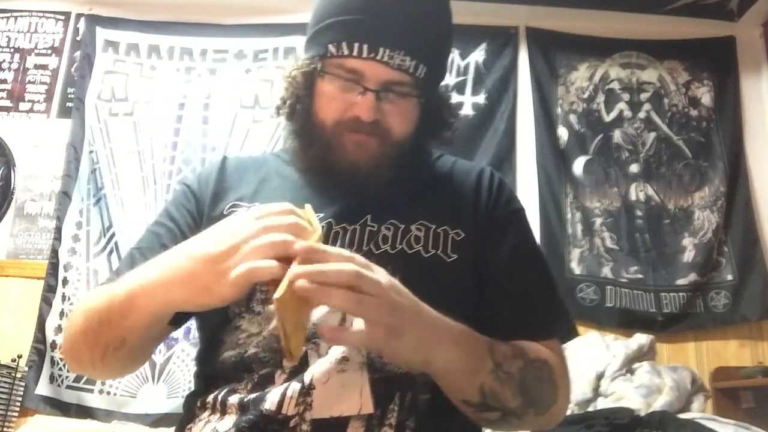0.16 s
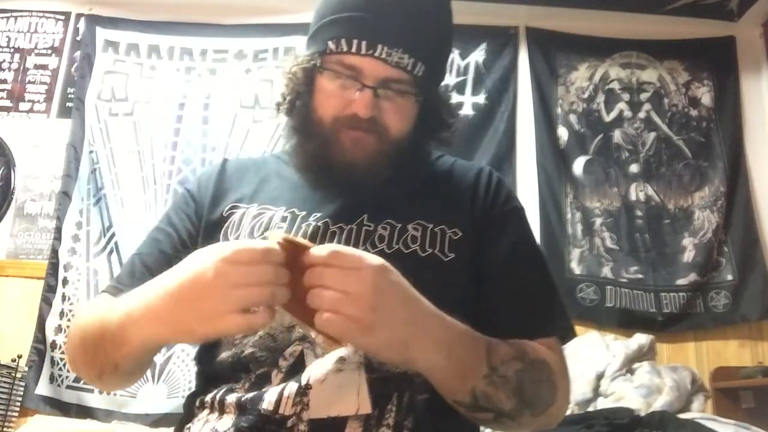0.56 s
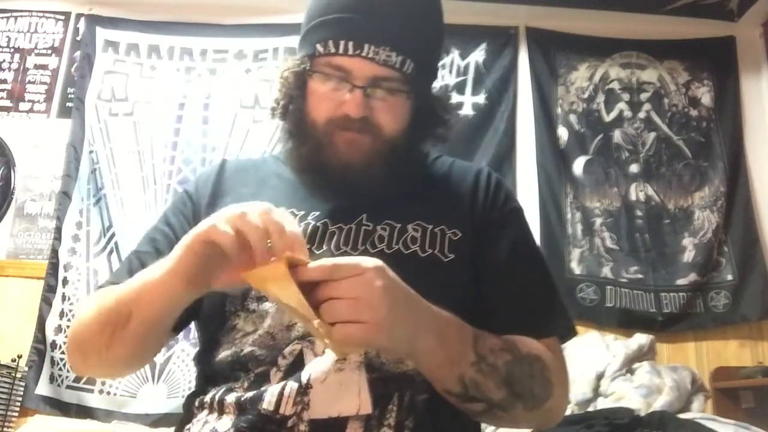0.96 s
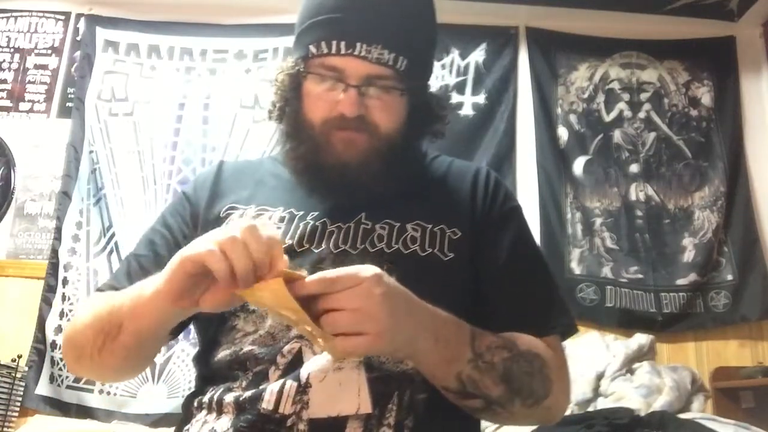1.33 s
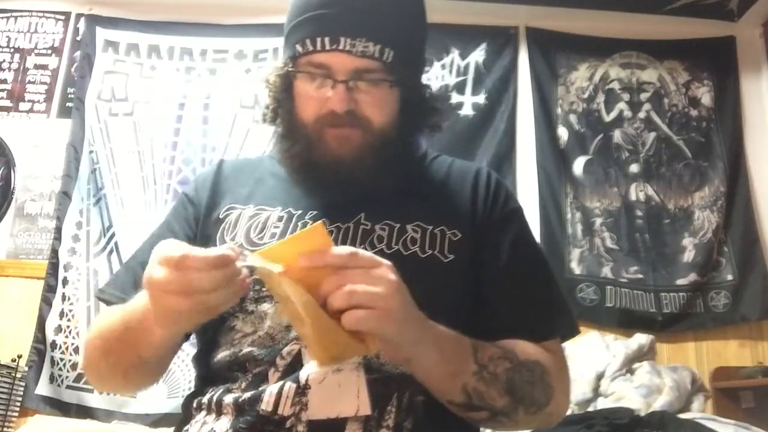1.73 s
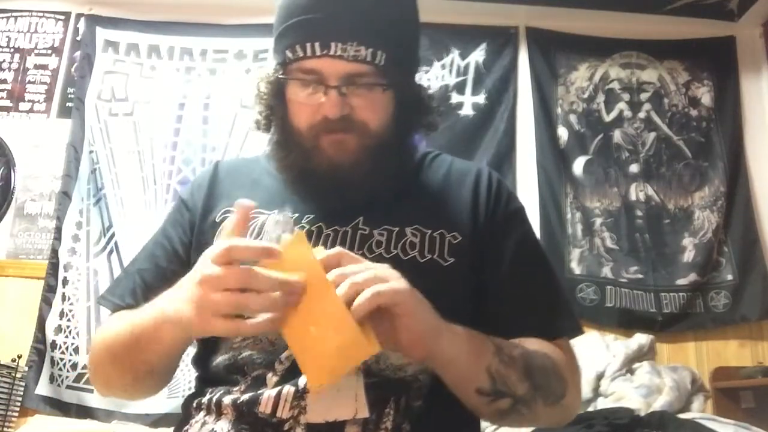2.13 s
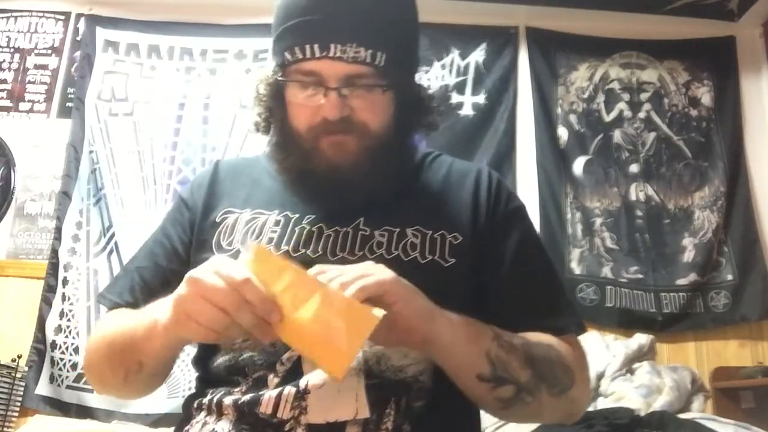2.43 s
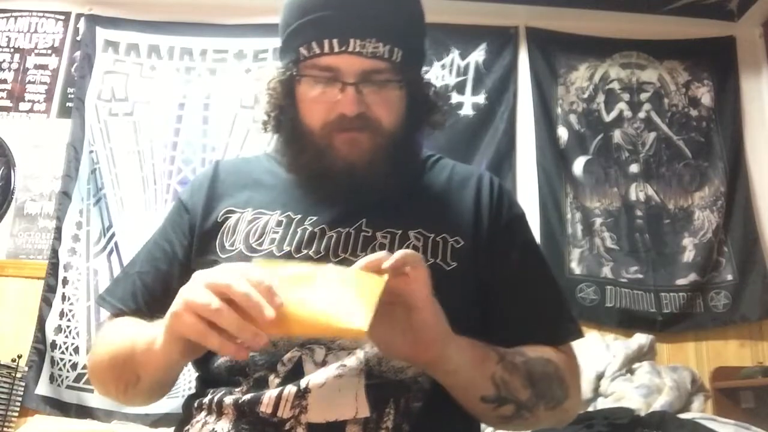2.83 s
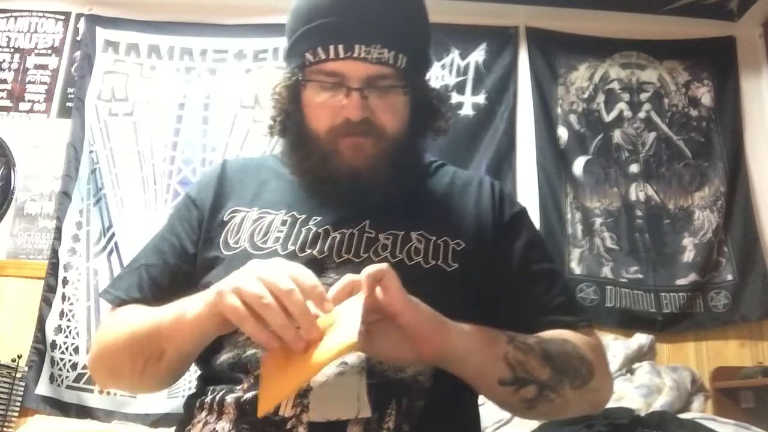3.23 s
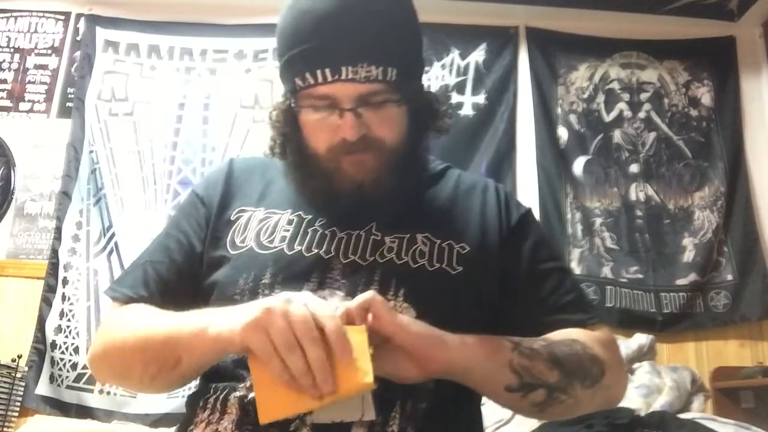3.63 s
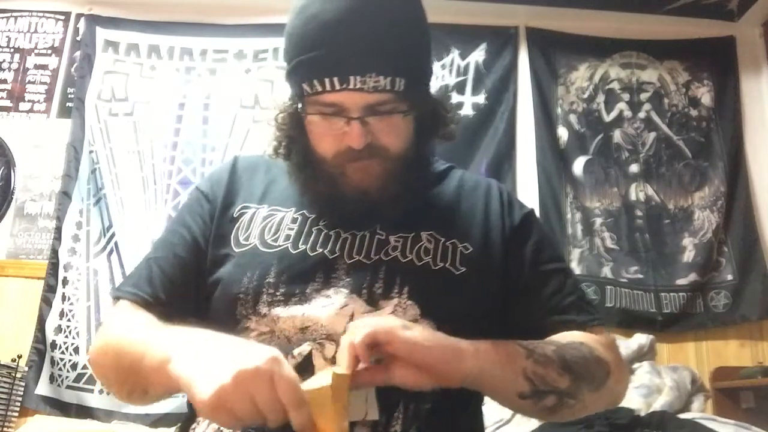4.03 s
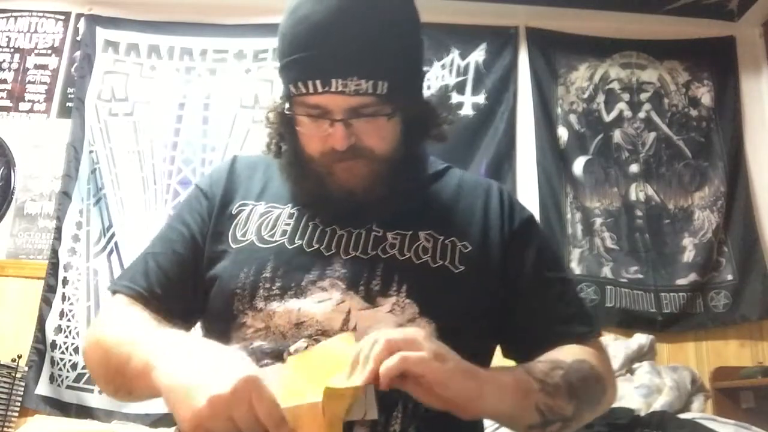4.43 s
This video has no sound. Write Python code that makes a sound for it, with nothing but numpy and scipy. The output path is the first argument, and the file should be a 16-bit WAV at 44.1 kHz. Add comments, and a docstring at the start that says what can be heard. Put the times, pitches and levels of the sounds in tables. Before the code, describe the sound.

Stiff paper crinkles, rips briefly in a few tugs, then rustles and snaps as hands work an envelope open in a quiet room.

```python
"""Opening a paper envelope

A furnished room, the microphone an arm's length from a small, stiff envelope opened by hand.
The flap is picked at, a strip tears off in three tugs, then the envelope is turned over and pried apart.
Fingers slide over the paper, its faces bump on the air between them, fibres break in dense crackle
and the panels buckle in sharp snaps."""
import sys
import numpy as np
from scipy import signal
from scipy.fft import rfft, irfft
from scipy.io import wavfile
from scipy.ndimage import uniform_filter1d

SR = 44100
rng = np.random.default_rng(int(sys.argv[2]) if len(sys.argv) > 2 else 0)


def to_wav(s):
    """Save 16-bit WAV."""
    ch = np.atleast_2d(s).T  # columns
    pcm = np.round(np.clip(ch, -1, 1) * 32767)  # PCM
    wavfile.write(sys.argv[1], SR, pcm.astype(np.int16))


N = 201563
TIME = np.arange(N) / SR


def undb(db):
    """Decibels to gain."""
    return 10 ** (np.asarray(db) / 20)


def unit(x):
    """Scale to rms 1."""
    return x / np.sqrt(np.mean(x ** 2) + 1e-18)


def add(out, start_s, x):
    """Mix x into out from start_s on."""
    start = int(start_s * SR)
    first, last = max(start, 0), min(start + len(x), N)
    if last > first:
        out[first:last] += x[first - start:last - start]


def envelope(start_s, hold_s, attack_s, release_s):
    """Rise to 1 at start_s, hold, then die away."""
    since_s = TIME - start_s
    return np.exp(np.minimum(since_s, 0) / attack_s - np.maximum(since_s - hold_s, 0) / release_s)


def freqs(size=2048):
    """Frequency axis of the colour filters."""
    return np.maximum(np.arange(size // 2 + 1) * SR / size, 1)


def colour(points):
    """A dB curve joining (freq_hz, level_db) points on a log-frequency axis."""
    hz, db = np.transpose(points)
    return np.interp(np.log(freqs()), np.log(hz), db)


def resonance(hz, width_hz, peak_db):
    """A resonant peak as a dB curve."""
    detuning = 2 * (freqs() - hz) / width_hz
    return 10 * np.log10(1 + undb(peak_db) ** 2 / (1 + detuning ** 2))


def response(curve_db):
    """The minimum-phase impulse response with this spectrum, energy 1."""
    cepstrum = irfft(np.log(undb(curve_db)))
    half = len(cepstrum) // 2
    cepstrum[1:half] *= 2
    cepstrum[half + 1:] = 0
    impulse = irfft(np.exp(rfft(cepstrum)))
    return impulse / np.linalg.norm(impulse)


def through(x, impulse):
    """Pass x through an impulse response."""
    return signal.fftconvolve(x, impulse)[:len(x)]


def tilted(x, points, tilt_db_per_octave):
    """Give x a colour, tilted above 500 Hz."""
    tilt_db = tilt_db_per_octave * np.log2(np.maximum(freqs(), 500) / 2000)
    return through(x, response(colour(points) + tilt_db))


def grains(count, per_s, spread_db):
    """Tiny clicks at random moments: most are small, a few stand out; rms 1."""
    chance, size, sign = rng.random((count, 3)).T
    size = np.minimum(-np.log(1 - size), 4)
    return unit((chance < per_s / SR) * np.sign(sign - .5) * undb(spread_db * size))


# Spectrum of the still room: freq_hz, level_db
ROOM_TONE_COLOUR = [(20, -23), (35, -21), (55, 1.5), (85, -6.5), (130, -5.5), (200, -8), (400, -4),
                    (600, -24.5), (1600, -14.5), (3000, -21), (8000, -24), (16000, -39)]


def room_tone():
    """Quiet indoor rumble with a little hiss."""
    return undb(-66) * unit(through(rng.standard_normal(N), response(colour(ROOM_TONE_COLOUR))))


# Decay of the furnished room, band by band: centre_hz, t60_s, level_db
ROOM_DECAY = [(194, 0.16, -10), (610, 0.22, -5.5), (1720, 0.19, -9), (4000, 0.14, -6), (11000, 0.14, -9)]


def room_echo(x, count=16384):
    """Near surfaces answer within a few ms; hanging cloth soaks up the treble first."""
    t = np.arange(count) / SR
    reflections = rfft(grains(count, per_s=7000, spread_db=3.5))
    log_hz, log_centres = np.log(freqs(count)), np.log([row[0] for row in ROOM_DECAY])
    onset = np.clip((t - 0.002) / 0.0029, 0, 1)
    tail = np.zeros(count)
    for (_, t60_s, level_db), this_band in zip(ROOM_DECAY, np.eye(len(ROOM_DECAY))):
        fade = undb(-60 * t / t60_s) * onset
        band = irfft(reflections * np.interp(log_hz, log_centres, this_band))
        tail += undb(level_db) * band * fade / np.linalg.norm(fade)
    return through(x, tail)


def crinkles():
    """Paper facets of many sizes flip at their own moments, each with its own short ring."""
    facets = [signal.iirpeak(hz, Q=7, fs=SR) for hz in np.geomspace(420, 2500, 11)]
    return unit(sum(signal.lfilter(*facet, grains(N, per_s=45, spread_db=5)) for facet in facets))


def friction():
    """The rough surface sticks and slips in small grains and the paper crinkles."""
    wander = unit(uniform_filter1d(rng.standard_normal(N), size=300))
    grip = unit(undb(3 * wander))
    slips = grains(N, per_s=4000, spread_db=3) * grip
    return undb(-0.5) * slips + undb(-5) * crinkles()


# Spectrum of rubbed paper at arm's length: freq_hz, level_db
FRICTION_COLOUR = [(60, -20.5), (180, -7.5), (350, -1.5), (600, -4), (950, -6), (1400, 0.5), (2200, -2.5),
                   (3300, -6.5), (4200, -6.5), (6500, -8.5), (9500, -21), (15000, -23)]


def rustle(held_db=-75, firm_rustle_db=-54.5):
    """The held paper stirs faintly, more as it bends towards each buckle and relaxes after it."""
    power = undb(held_db) ** 2
    for start_s, level_db, _, _ in PANEL_BUCKLES:
        bend = envelope(start_s, hold_s=0, attack_s=0.012, release_s=0.013)
        rustle_db = firm_rustle_db + 0.55 * (level_db - FIRM_BUCKLE_DB)
        power = power + (undb(rustle_db) * bend) ** 2
    return tilted(friction() * np.sqrt(power), FRICTION_COLOUR, tilt_db_per_octave=0.5)


# Fingers sliding over the envelope: start_s, length_s, level_db, tilt_db_per_octave
STROKES = [(-.04, 0.21, -53.5, 0), (0.105, 0.11, -52, 2.5), (0.242, 0.061, -50.5, 2.5),
           (0.477, 0.027, -42.5, -5), (0.559, 0.095, -55.5, 11), (0.64, 0.27, -54, 1),
           (1.008, 0.04, -56.5, -2), (1.091, 0.09, -54, 4.5), (2.023, 0.047, -45.5, 4.5),
           (2.25, 0.12, -38, 1.5), (2.494, 0.083, -51, 29), (2.631, 0.078, -39, 2),
           (2.749, 0.097, -54, 1.5), (2.838, 0.25, -51, -0.5), (3.045, 0.083, -43, 1.5),
           (3.245, 0.097, -52.5, 1.5), (3.449, 0.11, -50.5, -3.5), (3.58, 0.08, -46.5, 5),
           (3.655, 0.17, -41, -0.5), (3.782, 0.17, -48.5, -.5), (3.948, 0.26, -50.5, 2.5),
           (4.21, 0.31, -48.5, 3.5), (4.421, 0.16, -45, 1.5), (4.53, 0.12, -33, 1.5)]


def finger_strokes(fastest_at=0.34):
    """Each stroke speeds up and slows to rest; its loudness follows its speed."""
    out, surface = np.zeros(N), friction()
    for start_s, length_s, level_db, tilt in STROKES:
        speed = np.interp((TIME - start_s) / length_s, [0, fastest_at, 1], [0, 1, 0])
        out += tilted(surface * undb(level_db) * speed, FRICTION_COLOUR, tilt)
    return out


# The whole envelope flexing: start_s, pitch_hz, level_db
FLEXES = [(0.408, 430, -25.5), (.739, 273, -31.5), (0.947, 610, -43), (1.571, 300, -22.5),
          (1.73, 218, -28.5), (2.164, 270, -29), (2.607, 390, -27), (3.681, 298, -29.5), (4.065, 347, -37),
          (4.483, 597, -21)]


def hollow_bumps(width_hz=160, count=4096):
    """The broad faces of the envelope bump on the air between them: a dull, quickly damped puff."""
    out, t = np.zeros(N), np.arange(count) / SR
    age = np.pi * width_hz * t
    puff = age * np.exp(-age)
    for start_s, pitch_hz, level_db in FLEXES:
        add(out, start_s, undb(level_db) * np.sin(2 * np.pi * pitch_hz * t) * puff)
    return out


# Spectrum of tearing paper at arm's length: freq_hz, level_db
RIP_COLOUR = [(80, -52), (300, -14), (600, -9.5), (950, -8), (1450, 3), (2500, -3.5), (3200, -7),
              (4200, 2.5), (5100, -3), (7000, -4.5), (9000, -10), (13500, -9), (16000, -15.5)]
# Tugs that drive the rip along the flap: start_s, length_s, level_db, tilt_db_per_octave
RIP_TUGS = [(1.251, 0.077, -34, 1), (1.386, 0.07, -44, -0.5), (1.504, 0.058, -29, 1.5)]


def rip(bunch_s=0.002, rise_db_per_s=64):
    """Each tug bites fast and pulls ever harder; the rip catches and breaks bunches of fine fibres."""
    bunch = np.exp(-np.arange(512) / SR / bunch_s)
    catches = unit(through(abs(grains(N, per_s=260, spread_db=2.5)), bunch))
    surges = 1 + undb(-1) * np.minimum(catches, 3)
    fine_fibres = unit(grains(N, per_s=9000, spread_db=3) * surges)
    out = np.zeros(N)
    for start_s, length_s, level_db, tilt in RIP_TUGS:
        rise_db = rise_db_per_s * np.clip(TIME - start_s, 0, length_s)
        force = undb(level_db + rise_db) * envelope(start_s, length_s, attack_s=0.0046, release_s=0.005)
        out += tilted(fine_fibres * force, RIP_COLOUR, tilt)
    return out


# Thick fibres and spots of glue breaking: start_s, level_db
FIBRE_BREAKS = [(1.076, -24.5), (1.125, -16.5), (1.1275, -15.5), (1.2189, -29.5), (1.2733, -10),
                (1.282, -5.5), (1.2959, 0), (1.3244, -4), (1.37, -7.5), (1.3987, -11.5), (1.4383, -6.5),
                (1.461, -12), (1.473, -9.5), (1.477, -6), (1.5135, -4), (1.565, -9), (2.0418, -23.5),
                (2.266, -16), (2.5711, -6.5)]


def fibre_cracks(splinter_s=0.0014, count=512):
    """A thick fibre splinters and takes its neighbours with it in a single crack."""
    out, t = np.zeros(N), np.arange(count) / SR
    for start_s, level_db in FIBRE_BREAKS:
        splinters = grains(count, per_s=15000, spread_db=9.5) * np.exp(-t / splinter_s)
        add(out, start_s, undb(level_db) * splinters / np.linalg.norm(splinters))
    return tilted(out, RIP_COLOUR, tilt_db_per_octave=2.5)


# Bass, middle, treble and top of a snap: low_hz, high_hz
SNAP_BANDS = [(150, 900), (900, 3200), (3200, 8000), (8000, 16000)]


def voiced(click, levels_db, span_s=0.006):
    """Colour a click smoothly so that its energy, taken over span_s, nears these four band levels."""
    hz, centres_hz = freqs(len(click)), np.mean(SNAP_BANDS, axis=1)
    for _ in range(2):
        power = abs(rfft(click)) ** 2 * 2 / len(click) / (span_s * SR)
        band_db = 10 * np.log10([power[(hz > low) & (hz < high)].sum() for low, high in SNAP_BANDS])
        curve_db = colour(list(zip(centres_hz, levels_db - band_db)))
        click = through(click, response(curve_db)) * np.sqrt(np.mean(undb(curve_db) ** 2))
    return click


# Spectrum of a stiff panel popping: freq_hz, level_db
PANEL_COLOUR = [(60, -29.5), (200, -8.5), (550, 6), (850, 1.5), (1350, 6), (1900, 3.5), (2700, 1),
                (3300, -2), (4200, 1.5), (5000, -5), (6800, 2.5), (9000, 0.5), (14000, 6), (16000, -3)]
# The paper buckling, treble given against the middle band: start_s, level_db, pitch_hz, treble_db
PANEL_BUCKLES = [(.1319, -31, 1610, -14.5), (0.1461, -37.5, 1650, -15), (0.3412, -20, 1920, -3.5),
                 (0.4057, -32, 2860, -6), (0.4514, -40.5, 2340, -14), (0.4888, -31, 1240, -9.5),
                 (0.4989, -26.5, 4600, 0.5), (.722, -38, 1220, -12), (0.7372, -23, 2370, -6),
                 (0.7841, -32.5, 1370, -11), (0.796, -29.5, 1350, -3.5), (1.1383, -40, 1890, -21),
                 (1.4045, -25, 4400, 2.5), (1.512, -26, 1580, -3), (1.57, -24, 1950, -5.5),
                 (1.6794, -35, 1990, -7.5), (1.699, -23, 2700, -6.5), (1.7282, -24, 2580, 2),
                 (1.8199, -39.5, 2440, -24), (1.8296, -38.5, 1800, -36), (1.865, -46.5, 1740, -17),
                 (1.9371, -24, 1700, -8.5), (2.0734, -30.5, 1760, -7), (2.0831, -29, 1920, 1),
                 (2.1644, -25.5, 2320, -1.5), (2.391, -28, 2050, -5.5), (2.4611, -33, 2950, -11.5),
                 (2.5119, -33.5, 1440, -9), (2.5305, -25, 1340, -4.5), (2.5463, -35, 1420, 1),
                 (2.608, -20.5, 1500, -6), (2.667, -22.5, 1220, 0), (2.7665, -36, 1380, -13),
                 (2.8964, -31.5, 1310, -16), (2.93, -34, 1430, -30), (2.9876, -35, 1590, -11),
                 (3.1377, -39, 1730, -14), (3.195, -37.5, 2320, -18), (3.267, -38.5, 1850, -10.5),
                 (3.3283, -39, 2060, -11.5), (3.4395, -32, 1900, -20), (3.4753, -40, 1760, -35),
                 (3.4975, -38, 2730, -1), (3.545, -40, 1870, -19), (3.6779, -36, 1520, -14),
                 (3.6955, -32, 2240, -7.5), (3.7428, -33, 2230, -5), (3.8108, -38, 2060, -12),
                 (3.8412, -36, 3020, -11), (3.895, -34.5, 1540, -7.5), (4.013, -40.5, 1320, -2.5),
                 (4.3011, -27.5, 1440, -5.5), (4.311, -27.5, 1610, -5), (4.4739, -34.5, 3080, -10),
                 (4.552, -31, 1840, -15), (4.5636, -27, 1940, -9)]
FIRM_BUCKLE_DB = -26.5


def snaps(crease_db, ring_db, lead_samples=256, count=2048):
    """Creases give way, the panel pops through and rings, then settles in finer, duller clicks."""
    out, t = np.zeros(N), (np.arange(count) - lead_samples) / SR
    dull = signal.butter(1, 3920, fs=SR)
    for start_s, level_db, pitch_hz, treble_db in PANEL_BUCKLES:
        force_db = level_db - FIRM_BUCKLE_DB
        settle_s = 0.0028 * 2 ** (-force_db / 30.5)  # weak buckles settle more slowly
        swell = np.exp(-abs(t) / np.where(t < 0, 0.33 * settle_s, settle_s))
        creases = signal.lfilter(*dull, grains(count, per_s=12000, spread_db=1)) * swell
        push = undb(crease_db - 0.18 * force_db) * creases  # harder buckles pop more cleanly
        push[lead_samples] += 1  # the pop itself
        panel_db = colour(PANEL_COLOUR) + resonance(pitch_hz, width_hz=520, peak_db=ring_db)
        snap = through(push, response(panel_db))
        bass_db = -14 + 0.11 * force_db
        top_db = -13 + 1.64 * treble_db  # a sharp crease lifts the top octave more than the treble
        balance_db = np.array([bass_db, 0, treble_db, top_db])
        add(out, start_s + t[0], voiced(snap, level_db + balance_db))
    return out


def scene():
    """The envelope close by, in its room; the walls hear each snap from all sides, so more smoothly."""
    paper = rip() + fibre_cracks() + finger_strokes() + rustle()
    bumps = hollow_bumps()
    to_microphone = paper + bumps + snaps(crease_db=-13.5, ring_db=13)
    to_walls = paper + undb(4.5) * bumps + snaps(crease_db=-19.5, ring_db=2.5)
    return (to_microphone + room_echo(to_walls) + room_tone())[None]


def record(dry):
    """The microphone drops the deepest bass and cuts the top."""
    low_cut = signal.butter(2, 40, "high", fs=SR, output="sos")
    high_cut = signal.ellip(10, .2, 80, 16000, fs=SR, output="sos")
    return signal.sosfilt(high_cut, signal.sosfilt(low_cut, dry))


dry = scene()
out = record(dry)
to_wav(out)
```